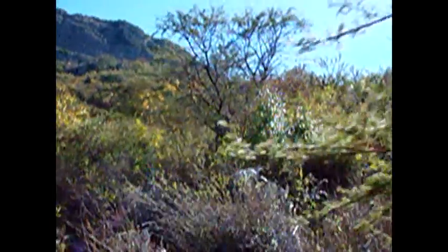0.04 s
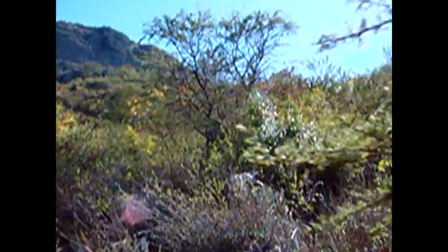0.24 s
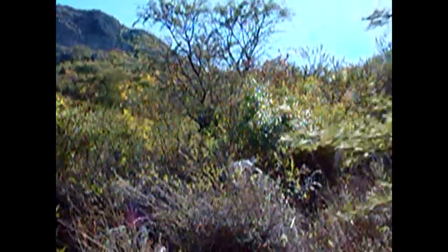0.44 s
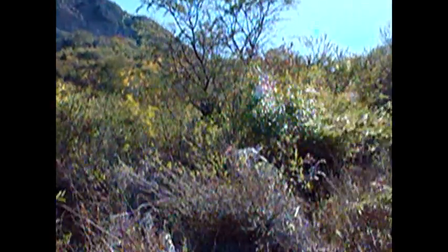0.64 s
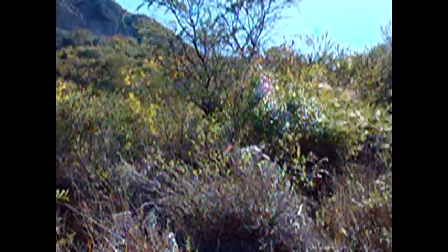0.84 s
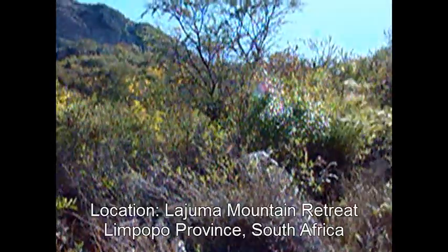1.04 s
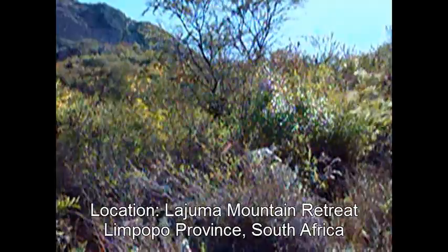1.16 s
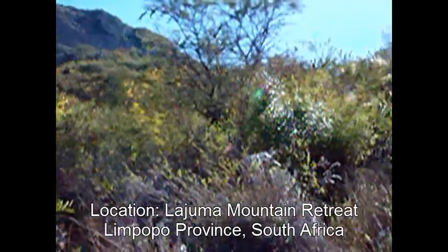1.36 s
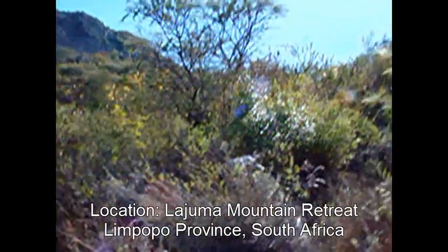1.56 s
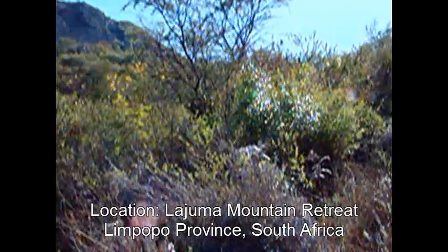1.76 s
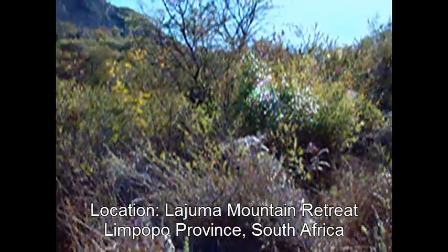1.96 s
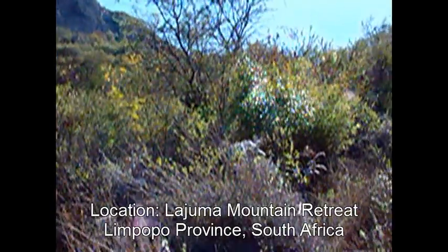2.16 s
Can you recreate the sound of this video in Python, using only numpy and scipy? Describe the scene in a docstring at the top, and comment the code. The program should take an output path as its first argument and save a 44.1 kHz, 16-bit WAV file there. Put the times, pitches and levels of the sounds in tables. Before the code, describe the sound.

A young antelope calf bleats once, long, hoarse and strained, then dry grass rustles and knocks

```python
"""An antelope calf bleats once, long and strained: harmonics of a hoarse voice through moving resonances.
During the cry come a noisy burst as the voice cracks, and dull knocks and low bumps near the microphone.
The dense bush scatters the cry and leaves a faint tail, made of sparse random reflections.
Then feet and clothes knock and brush through the dry grass: damped pushes and swells of band noise.
Fine random crackle and a quiet outdoor hiss of drifting, filtered noise lie under it all."""
import sys
import numpy as np
from scipy import signal
from scipy.fft import rfft, irfft
from scipy.io import wavfile
from scipy.ndimage import uniform_filter1d

SR = 44100
rng = np.random.default_rng(int(sys.argv[2]) if len(sys.argv) > 2 else 0)


def file_out(sig):
    """Save sig as 16-bit WAV at sys.argv[1]."""
    # one column per channel
    cols = np.atleast_2d(sig).T
    # limit, then scale
    lim = np.clip(cols, -1, 1)
    pcm = np.round(lim * 32767).astype(np.int16)
    wavfile.write(sys.argv[1], SR, pcm)


N = 97108


def amp(db):
    """Decibels to gain."""
    return 10 ** (np.asarray(db) / 20)


def unit(x):
    """Scales to rms 1."""
    return x / np.sqrt(np.mean(abs(x) ** 2) + 1e-20)


def curve(table, t):
    """Each column of a time table, joined by straight lines."""
    time_s, *columns = np.transpose(table)
    return [np.interp(t, time_s, column) for column in columns]


def colour(table, hz):
    """Gain of a spectrum table at given frequencies, joined on a log frequency axis."""
    table_hz, db = np.transpose(table)
    return amp(np.interp(np.log(hz + 1), np.log(table_hz), db))


def tint(x, table):
    """Filters by a spectrum table."""
    return irfft(rfft(x) * colour(table, np.fft.rfftfreq(N, 1 / SR)), N)


def wander(size, hz):
    """Smooth random motion of rms 1, fading out above about the given rate."""
    f = np.fft.rfftfreq(N, 1 / SR)
    smooth = irfft(rfft(rng.standard_normal(N)) * np.exp(-(f / hz) ** 2), N)
    return unit(smooth)[:size]


def band(x, hz, octaves):
    """A bell-shaped band on a log frequency axis, rms 1."""
    f = np.fft.rfftfreq(N, 1 / SR) + 1
    bell = np.exp(-.5 * (np.log2(f / hz) / octaves) ** 2)
    return unit(irfft(rfft(x) * bell, N))


def resonance(centre_hz, width_hz, db, harmonics):
    """Power of a moving resonance, shared out among the harmonics."""
    shape = 1 / (1 + (2 * (harmonics - centre_hz) / width_hz) ** 2) ** 2
    return amp(db) ** 2 * shape / shape.sum(0)


def harmonic_levels(hz, effort, t):
    """Throat colour plus the resonances of the mouth, giving each harmonic its gain over time."""
    # colour of the throat: frequency_hz, level_db per harmonic, before effort
    throat = [(220, -76), (470, -63.5), (720, -55), (940, -48), (1110, -39), (1200, -34.5), (1270, -28.5),
              (1350, -23), (1450, -30), (1490, -36), (1550, -42), (1620, -44.5), (1690, -37), (1790, -40.5),
              (1900, -36.5), (2110, -49), (2320, -40.5), (2620, -43.5), (3150, -53), (3600, -49.5),
              (4100, -56.5), (4480, -42), (4950, -51.5), (5600, -50.5), (6900, -69), (7900, -62),
              (8800, -69), (10500, -71)]
    # ringing resonance of the mouth, broad at first: time_s, centre_hz, level_db, width_hz
    mouth = [(0, 2700, -52.5, 500), (.035, 2840, -35, 580), (.07, 3000, -32.5, 450), (.12, 2990, -28, 735),
             (.16, 2930, -36, 690), (.21, 2980, -38.5, 445), (.25, 2750, -42.5, 500), (.3, 2800, -29, 200),
             (.325, 2810, -33, 180), (.358, 2830, -25.5, 145), (.42, 2800, -36, 173),
             (.5, 2870, -27.5, 170), (.56, 2800, -33, 170), (.625, 2900, -26, 140), (.68, 2890, -31.5, 200),
             (.775, 2860, -27, 174), (.825, 2900, -38, 191), (.848, 2880, -43.5, 298),
             (.87, 2750, -36.5, 398), (.9, 2650, -54, 490)]
    # rasping upper resonance: time_s, centre_hz, level_db
    rasp = [(0, 5400, -79), (.07, 5800, -46), (.12, 5850, -28.5), (.16, 5540, -34), (.21, 5630, -41),
            (.24, 5200, -60), (.29, 5900, -38.5), (.35, 5300, -34.5), (.41, 4870, -36.5), (.49, 4700, -30),
            (.57, 5140, -32.5), (.64, 5350, -29.5), (.71, 5430, -33.5), (.78, 5170, -33), (.82, 5250, -45),
            (.855, 5440, -31), (.9, 5200, -48.5)]
    rasp_width_hz, rasp_floor_hz = 830, 4150
    top_hz, top_width_hz, top_db = 7960, 300, -17.5  # top_db is relative to the rasp

    mouth_hz, mouth_db, mouth_width = curve(mouth, t)
    rasp_hz, rasp_db = curve(rasp, t)
    harmonics = np.arange(1, 48)[:, None] * hz
    # below this pitch the mouth is closing and the throat colour sinks with it
    open_pitch_hz = 221.6
    closing = np.minimum(hz / open_pitch_hz, 1)
    power = (colour(throat, harmonics / closing) * amp(effort)) ** 2
    power += resonance(mouth_hz, mouth_width, mouth_db, harmonics)
    above_floor = 1 / (1 + (rasp_floor_hz / harmonics) ** 60)
    power += resonance(rasp_hz, rasp_width_hz, rasp_db, harmonics) * above_floor
    moving_top_hz = top_hz * np.sqrt(hz / hz.mean())
    power += resonance(moving_top_hz, top_width_hz, rasp_db + top_db, harmonics)
    return harmonics, np.sqrt(power)


def bleat():
    """Jittery vocal pulses and turbulence, shaped by the throat and its moving resonances."""
    # glide of the voice: time_s, pitch_hz
    pitch = [(0, 205), (.035, 211), (.108, 247), (.125, 247.5), (.175, 233), (.212, 231), (.243, 221),
             (.28, 237), (.318, 231.5), (.345, 235.5), (.372, 236), (.392, 240.5), (.448, 237),
             (.49, 242.5), (.525, 242.5), (.595, 237), (.635, 237), (.69, 227.5), (.72, 227), (.738, 222.5),
             (.765, 226), (.79, 221.5), (.848, 224), (.875, 205), (.9, 189)]
    # vocal effort: time_s, effort_db
    push = [(0, -7.5), (.018, -14.5), (.035, -7.5), (.065, -2.5), (.11, -1), (.2, -1.5), (.25, 0.5),
            (.29, -2.5), (.4, -2), (.5, -1), (.62, -0.5), (.75, -3.5), (.84, 0), (.868, 0), (.882, -7),
            (.9, -29)]
    # hoarseness; the voice cracks once and frays at the end: time_s, noise_share_db at 1400 Hz
    hoarseness = [(0, -16), (.06, -21), (.12, -21), (.2, -23), (.266, -22), (.283, -3), (.298, -19),
                  (.4, -21), (.6, -22), (.8, -21), (.86, -19), (.9, -12)]
    # colour of the breathy wash beside the harmonics: frequency_hz, relative level_db per Hz
    breath = [(100, -53), (400, -39), (800, 1.5), (1300, -4.5), (1550, -9.5), (1800, -2.5), (2050, -3.5),
              (2400, 4), (2900, 1.5), (3400, -3.5), (4000, -3.5), (4500, -23), (5600, 7.5), (6900, -16.5),
              (8000, -2), (10000, -33)]
    jitter, jitter_hz = .006, 200  # share of the pitch, rate
    shimmer_db, shimmer_hz = 1.5, 75.6  # flicker: dB in the wash and at 5 kHz in the voice, rate
    flutter_depth, flutter_hz, flutter_growth = 0.077, 11, 0.88  # depth at 1400 Hz, rate, octaves per octave
    hoarse_db_per_octave, most_noise = 7, .5  # noise rises away from 1400 Hz, up to this share
    smear_rad = 1.4  # rms spread of the harmonics' fixed phases
    wash_db, wash_follows_hoarse = -35.5, .5  # base level, dB per dB of hoarseness

    t = np.arange(0, pitch[-1][0], 1 / SR)
    size = len(t)
    (hz,), (effort,), (hoarse,) = curve(pitch, t), curve(push, t), curve(hoarseness, t)
    harmonics, levels = harmonic_levels(hz, effort, t)
    phase = 2 * np.pi * np.cumsum(hz * (1 + jitter * wander(size, jitter_hz))) / SR
    # air bursts out at each vocal pulse, then eases
    puffs = unit(0.38 + np.exp(-(phase / (2 * np.pi) % 1) / 0.45))
    shimmer = shimmer_db * wander(size, shimmer_hz)
    voice = np.zeros(size)
    for order, (f, gain) in enumerate(zip(harmonics, levels), start=1):
        octave = np.log2(f.mean() / 1400)
        noise_share = np.minimum(amp(hoarse + hoarse_db_per_octave * abs(octave)), most_noise)
        # each harmonic wavers in level and phase, more so the higher it is
        depth = min(flutter_depth * 2 ** (flutter_growth * octave), .5)
        flutter = unit(np.exp(depth * (wander(size, flutter_hz) + 1j * wander(size, flutter_hz))))
        air = unit(wander(size, 190) + 1j * wander(size, 190)) * puffs
        mix = np.sqrt(1 - noise_share ** 2) * flutter + noise_share * air
        partial = mix * np.exp(1j * (order * phase + smear_rad * rng.standard_normal()))
        voice += gain * amp(shimmer * f / 5000) * partial.real
    wash = unit(tint(rng.standard_normal(N), breath))[:size] * puffs
    wash = wash * amp(wash_db + effort + shimmer + wash_follows_hoarse * (hoarse - hoarse.mean()))
    onset = np.minimum(t / 0.0042, 1)
    return np.pad((np.sqrt(2) * voice + wash) * onset, (0, N - size))


def bush(x, t60):
    """Sparse reflections from branches and slopes, dying by 60 dB in t60 seconds."""
    t = np.arange(SR) / SR
    hits = rng.choice([-1., 1.], SR) * (rng.random(SR) < 2500 / SR)  # about 2500 per second
    taps = hits * (t > .003) * amp(-60 * t / t60)
    return signal.fftconvolve(x, taps / np.linalg.norm(taps))[:N]


def knocks():
    """Each dull knock close by is a short oscillating push that swells and dies around its peak."""
    # knocks before the low cut: peak_s, level_db, pitch_hz, length_s
    table = [(.118, -28, 523, 0.00095), (0.152, -29.5, 260, 0.0013), (0.273, -30, 417, 0.0016),
             (0.317, -29.5, 385, 0.0011), (1.068, -33.5, 505, 0.0015), (1.1367, -34, 646, 0.002),
             (1.143, -23.5, 850, 0.00062), (1.1465, -25.5, 414, 0.0012), (1.158, -31.5, 573, 0.0039),
             (1.166, -37, 450, .002), (1.192, -35, 760, .0018), (1.434, -31, 660, 0.00051),
             (1.5018, -47, 2600, .0005), (1.503, -30, 915, 0.00048), (1.507, -33.5, 350, 0.00089),
             (1.5236, -20.5, 694, 0.00086), (1.524, -35, 1390, 0.0012), (1.596, -38, 1890, 0.00026),
             (1.597, -29.5, 884, 0.0015), (1.735, -29.5, 1570, 0.00042), (1.931, -33.5, 604, 0.00071)]
    t = np.arange(N) / SR
    out = np.zeros(N)
    for peak_s, db, hz, length in table:
        swell = np.exp(1 - np.sqrt(1 + 2 * ((t - peak_s) / length) ** 2))
        out -= amp(db) * swell * np.cos(2 * np.pi * hz * (t - peak_s))
    return out


def swishes(table, grain_db):
    """Swells of dense noise grains, each in its own band."""
    t, out = np.arange(N) / SR, np.zeros(N)
    for peak_s, length, db, hz, octaves in table:
        grains = rng.standard_normal(N) * amp(grain_db * wander(N, 400))
        out += amp(db) * np.exp(-(1.24 * (t - peak_s) / length) ** 2) * band(grains, hz, octaves)
    return out


def crack_and_brushes():
    """A noisy burst as the voice cracks, then brushes through dry grass, as swells of grainy noise."""
    # the first row is the burst as the voice cracks; the others are brushes through dry grass
    # levels before the low cut: peak_s, length_s, level_db, centre_hz, width_octaves
    table = [(.283, 0.021, -31.5, 1240, .5), (1.064, 0.024, -43, 755, .9), (1.155, 0.032, -38.5, 520, 0.94),
             (1.21, 0.059, -49, 643, 0.6), (1.185, 0.048, -45, 7380, 0.34), (1.36, 0.17, -50.5, 630, 0.45),
             (1.36, 0.12, -49, 6860, 0.53), (1.61, 0.013, -47, 850, 0.27),
             (1.755, 0.041, -48.5, 1040, 0.79), (1.82, 0.28, -51, 3670, 0.85),
             (1.76, 0.042, -50.5, 357, 0.91), (1.84, 0.079, -48.5, 685, 0.77),
             (1.877, 0.0059, -41.5, 2010, 0.23), (1.892, 0.013, -44, 2850, 0.5),
             (2.1, 0.073, -54.5, 5300, 0.17), (2.13, 0.11, -50, 524, 0.47),
             (2.178, 0.01, -50.5, 6840, 0.11)]
    return swishes(table, grain_db=2)


def bumps():
    """Air and handling bump the microphone, as low swells of smoother noise."""
    # bumps: peak_s, length_s, level_db, centre_hz, width_octaves
    table = [(.075, 0.036, -45.5, 170, 0.58), (.16, 0.042, -47, 130, 0.52), (.4, 0.064, -62, 118, 0.57),
             (.56, .05, -48, 403, 0.88), (1.15, 0.02, -50.5, 195, 0.83), (1.8, 0.11, -61, 207, 0.63)]
    return swishes(table, grain_db=1)


def crackle():
    """Small random ticks of grass and handling, around 756 Hz."""
    ticks_per_s, level_db, spread_db = 230, -58, 3.5  # level before the low cut
    size = amp(spread_db * np.minimum(rng.exponential(1, N), 2))
    clicks = (rng.random(N) < ticks_per_s / SR) * rng.choice([-1, 1], N) * size
    return amp(level_db) * band(clicks, 756, .75)


def hiss():
    """Leaves and distant air: filtered noise in patches that drift over time and frequency."""
    # colour of the outdoor hiss: frequency_hz, relative level_db per Hz
    spectrum = [(18, -45), (30, -23), (102, -20.5), (321, 6), (390, 5), (774, -0.5), (1230, -1.5),
                (1870, -6), (3520, -5), (5600, -9.5), (7700, -6.5), (9590, -7), (10300, -36.5),
                (13400, -56.5), (22000, -120)]
    level_db, patchy_db = -49.5, 3.3
    f, _, z = signal.stft(rng.standard_normal(N), SR, nperseg=1024, noverlap=768)
    patches = uniform_filter1d(rng.standard_normal(z.shape), size=24, axis=0)
    patches = unit(uniform_filter1d(patches, size=12, axis=1))
    z = z * colour(spectrum, f)[:, None] * amp(patchy_db * patches)
    return amp(level_db) * unit(signal.istft(z, nperseg=1024, noverlap=768)[1][:N])


def scene():
    """The cry in the bush and the sounds close by, nearly mono with a little width in a few bands."""
    # stereo width of the cry: frequency_hz, side_minus_mid_db
    cry_width = [(60, -38.5), (110, -36), (210, -31), (410, -33), (770, -0.5), (1460, -32), (2760, -59.5),
                 (5220, -17.5), (9870, -78)]
    # stereo width of the other sounds and hiss: frequency_hz, side_minus_mid_db
    near_width = [(60, -46), (110, -52), (210, -61), (410, -61), (770, -26), (1460, -23), (2760, -38.5),
                  (5220, -16), (9870, -63)]
    cry = bleat()
    scatter = amp(-18) * bush(cry, t60=.1)
    tail = amp(-13.5) * bush(cry, t60=0.6)
    far = cry + scatter + tail
    low_cut = signal.butter(N=2, Wn=177, btype="high", fs=SR, output="sos")
    near = signal.sosfilt(low_cut, knocks() + crack_and_brushes() + crackle()) + bumps() + hiss()
    # a quarter-cycle shift sets the side apart from the middle
    side = signal.hilbert(tint(far, cry_width) + tint(near, near_width)).imag
    return np.array([far + near + side, far + near - side])


def record(dry):
    """The recorder's band limit, a steep low-pass."""
    edge_hz = 10400
    low_pass = signal.firwin(301, edge_hz, window=("kaiser", 8), fs=SR)
    return signal.oaconvolve(dry, low_pass[None], "same")


dry = scene()
out = record(dry)
file_out(out)
```